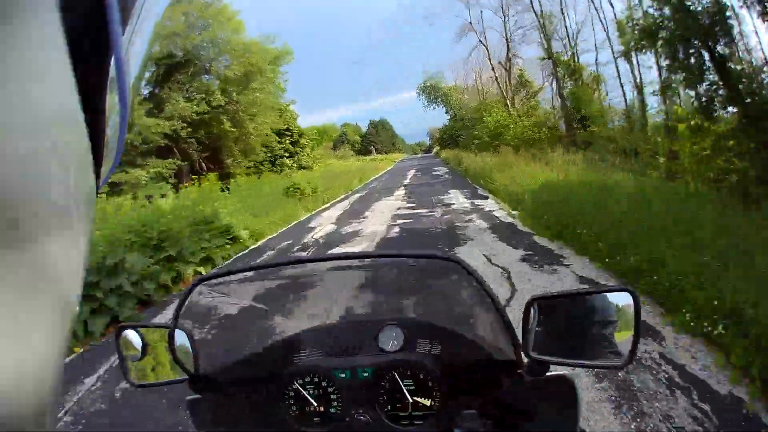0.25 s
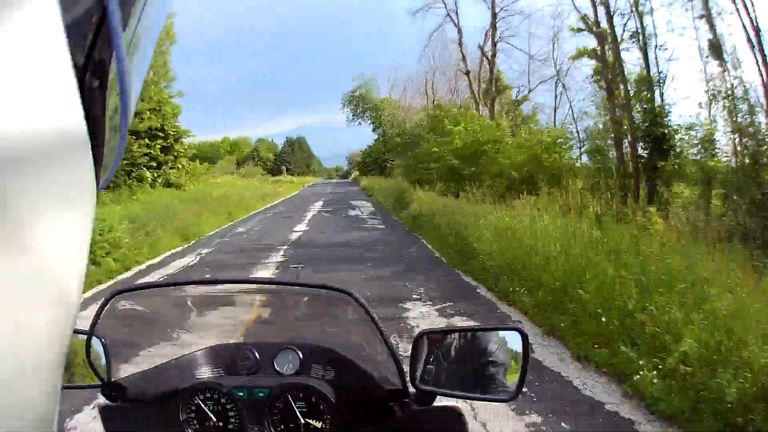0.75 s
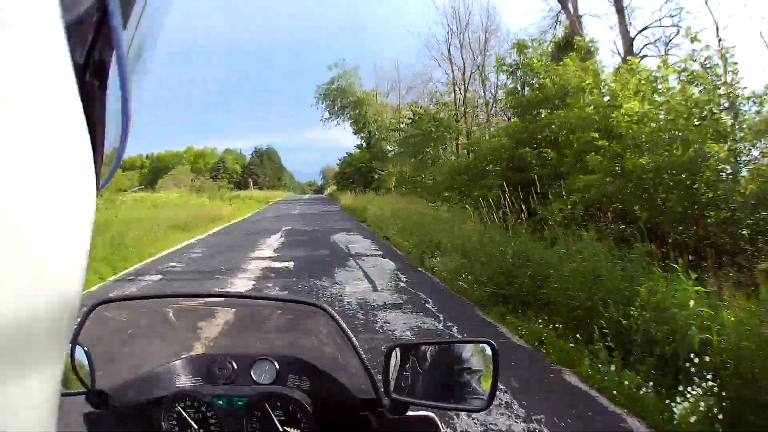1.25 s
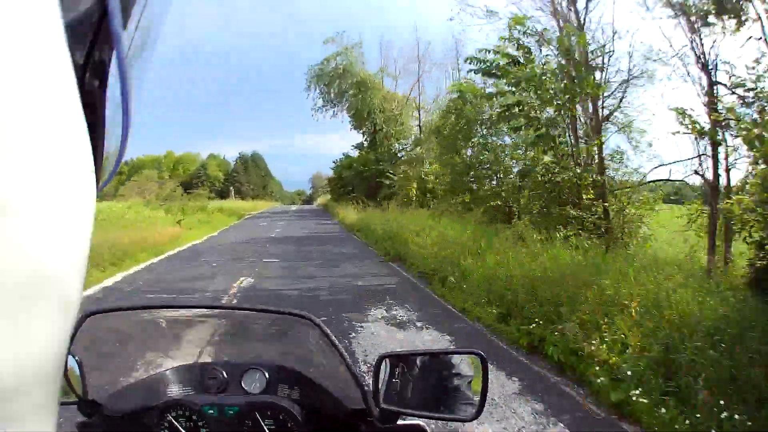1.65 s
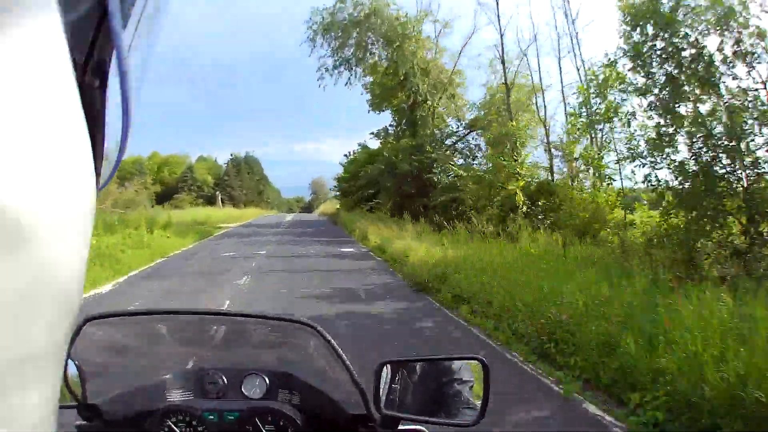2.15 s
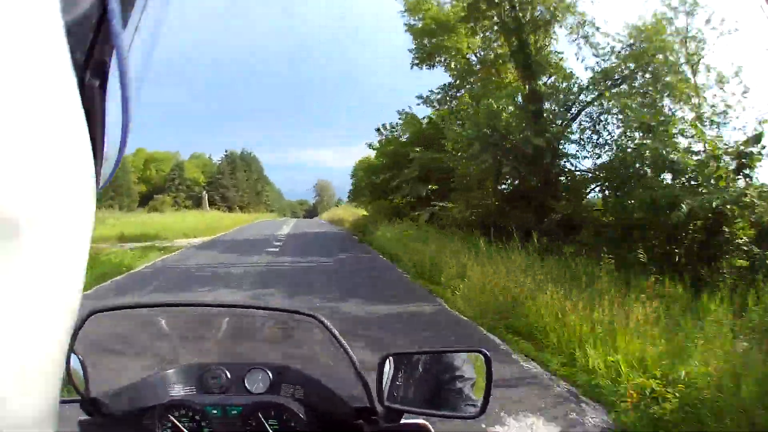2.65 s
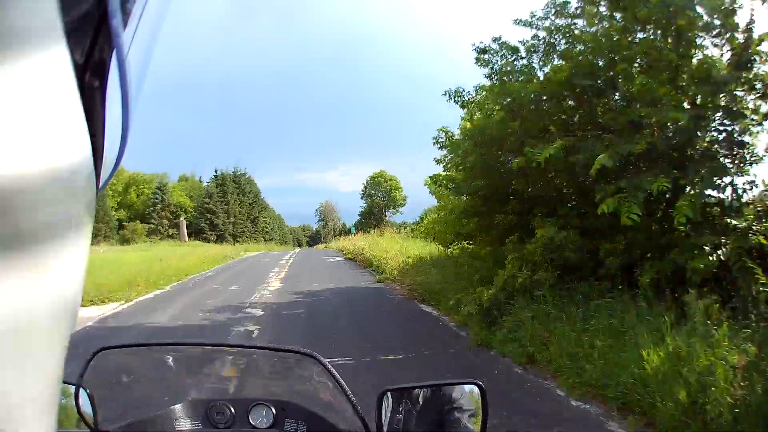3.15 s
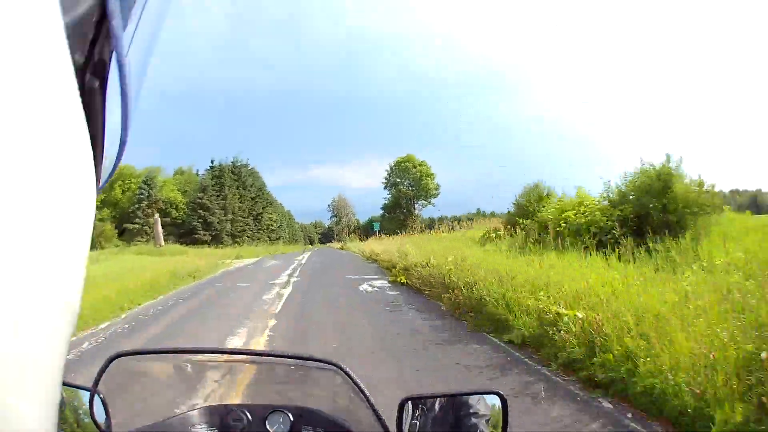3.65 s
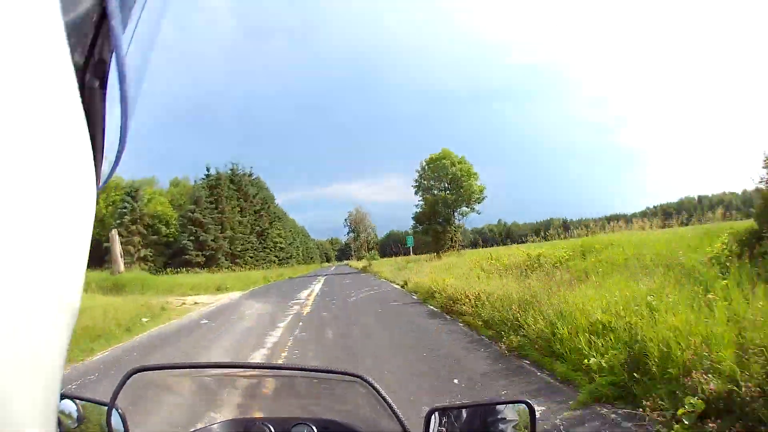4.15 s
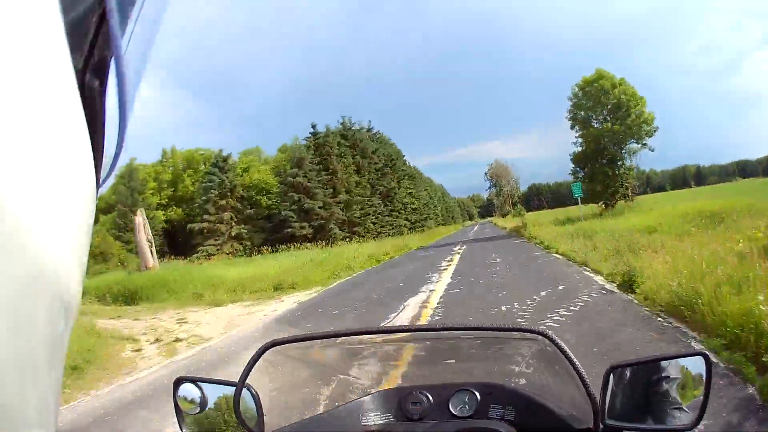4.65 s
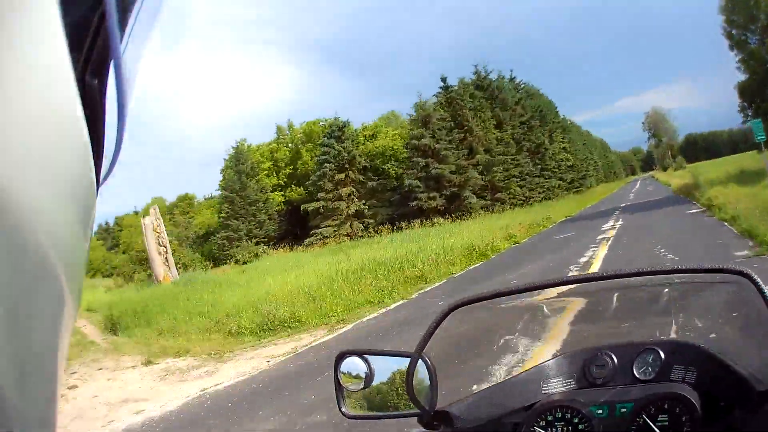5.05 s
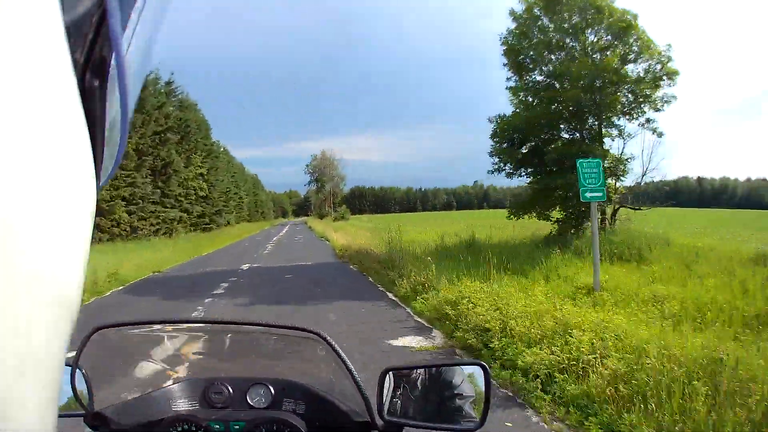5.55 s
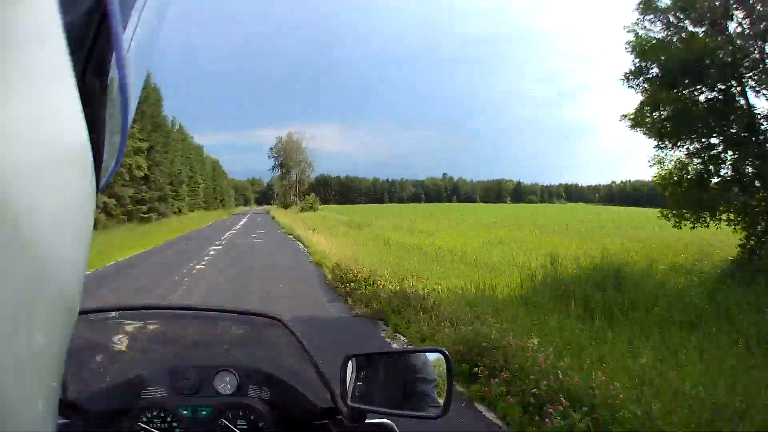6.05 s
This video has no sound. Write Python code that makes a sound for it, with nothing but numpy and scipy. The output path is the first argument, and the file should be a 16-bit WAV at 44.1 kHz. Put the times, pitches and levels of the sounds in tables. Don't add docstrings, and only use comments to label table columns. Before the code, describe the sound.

Outdoors on a country road, a small microphone at the rider's helmet catches a twin-cylinder motorcycle's low drone, valve knocking and thin gear whine under constant gusty wind. The throttle closes after two seconds, the pitch sinks and slack drive parts clack, then two quick blips lift the revs near the end. Small clicks and puffs pepper everything.

```python
import sys
import numpy as np
from scipy import signal
from scipy.io import wavfile

SR = 44100
rng = np.random.default_rng(int(sys.argv[2]) if len(sys.argv) > 2 else 0)


def elevation(decibels):
    levels = np.asarray(decibels, float)
    return 10 ** (levels / 20)


def pcm_store(signal):
    levels = np.round(np.clip(np.atleast_2d(signal), -1, 1) * 32767)
    wavfile.write(sys.argv[1], SR, levels.astype(np.int16).T)


N = 277389


def rms_one(x):
    return x / np.sqrt(np.mean(x ** 2) + 1e-20)


def in_time(rows):
    s, *columns = np.transpose(rows)
    return [np.interp(np.arange(N) / SR, s, c) for c in columns]


def drift(rate):
    r = np.exp(-40 * np.pi * rate / SR)
    white = rng.standard_normal(N // 20 + 4002)
    slow = signal.lfilter([1], [1, -2 * r, r * r], white)[4000:]
    return np.interp(np.arange(N) / 20, np.arange(len(slow)), rms_one(slow))


def resonate(x, hz, width):
    r = np.exp(-np.pi * width / SR)
    feedback = [1, -2 * r * np.cos(2 * np.pi * hz / SR), r * r]
    return signal.lfilter(np.array([1, 0, -1]) * (1 - r * r) / 2, feedback, x + 1e-18)


def soften(x, hz):
    return signal.sosfilt(signal.butter(2, hz, fs=SR, output="sos"), x + 1e-18)


def swell(top_s, rise_s, fall_s, hold_s):
    corners = top_s + np.cumsum([-abs(rise_s), abs(rise_s), hold_s + 1e-6, abs(fall_s)])
    return np.interp(np.arange(N) / SR, corners, [0, 1, 1, 0])


# (time [s], peak [dB], length [ms])
STEP_RUNS = [(.0579, -36, .5), (.0741, -40, .8), (.5085, -35, .6), (.6266, -35, 1.1), (.7129, -40, .9),
             (.8887, -37, 1.2), (1.0007, -41, .9), (1.1806, -39, .8), (1.6303, -37, 1.1),
             (2.0937, -40, 1.6), (2.3883, -40, 1.6), (2.5847, -39, 1.7), (2.8553, -34, .6),
             (2.8937, -37, 1.2), (3.2824, -36, 1.6), (3.3696, -36, 1.6), (3.7586, -39, 2.0),
             (3.801, -38, 1.1), (3.9045, -40, 1.0), (4.4616, -40, 1.6), (4.6247, -37, 1.2),
             (4.8166, -35, .8), (5.1308, -39, 1.1), (5.5438, -39, 2.5), (5.6147, -40, .7),
             (5.6253, -41, .7), (5.6713, -40, 1.9), (5.8193, -34, .8), (6.0868, -38, 1.2),
             (6.1067, -38, .9)]
# (time [s], peak [dB])
LONE_STEPS = [(.0457, -40), (.2001, -42), (.5181, -40), (.688, -40), (1.2171, -42), (1.408, -37),
              (1.4323, -38), (1.4984, -41), (1.5896, -41), (2.065, -40), (2.2798, -39), (2.6347, -39),
              (2.7777, -40), (2.7822, -35), (2.8179, -40), (3.0069, -42), (3.0695, -39), (3.1412, -42),
              (3.3191, -42), (3.653, -39), (4.0986, -40), (4.2222, -41), (4.274, -39), (4.2957, -38),
              (4.5171, -40), (4.6541, -39), (5.301, -40), (5.4638, -42), (6.2298, -40), (6.2129, -41)]
# (time [s], peak [dB])
FAINT_STEPS = [(0.0267, -46), (0.0327, -41), (0.0828, -45), (0.2306, -53), (0.2694, -48), (0.3097, -47),
               (0.3519, -46), (0.396, -46), (0.4399, -44), (0.4996, -42), (0.5709, -53), (0.5864, -42),
               (0.5989, -52), (0.6433, -44), (0.8734, -46), (0.9035, -46), (0.9511, -47), (0.9887, -47),
               (1.0513, -53), (1.0898, -51), (1.1285, -49), (1.2269, -51), (1.2678, -44), (1.3103, -51),
               (1.3758, -52), (1.4551, -52), (1.472, -46), (1.4779, -51), (1.4852, -43), (1.5243, -53),
               (1.5726, -49), (1.6537, -46), (1.744, -50), (1.7728, -49), (1.8409, -51), (1.8765, -53),
               (1.9156, -45), (2.0237, -48), (2.0693, -52), (2.1161, -52), (2.1953, -44), (2.2592, -44),
               (2.3759, -52), (2.3965, -51), (2.4243, -53), (2.5343, -52), (2.577, -45), (2.5979, -49),
               (2.6264, -50), (2.64, -49), (2.7224, -48), (2.7885, -42), (2.8293, -50), (2.847, -42),
               (2.8834, -50), (2.9143, -46), (2.9762, -46), (2.99, -51), (3.1008, -43), (3.128, -46)]
# (time [s], peak [dB])
LATE_STEPS = [(3.1559, -49), (3.1667, -51), (3.1837, -42), (3.2315, -51), (3.2936, -53), (3.3507, -42),
              (3.415, -45), (3.4454, -43), (3.4712, -53), (3.5073, -51), (3.5272, -51), (3.6271, -51),
              (3.7084, -46), (3.7401, -53), (3.8435, -49), (3.9168, -53), (4.153, -45), (4.2143, -53),
              (4.2438, -45), (4.3933, -50), (4.4177, -51), (4.446, -47), (4.4945, -51), (4.5375, -52),
              (4.5629, -53), (4.5906, -41), (4.6149, -50), (4.6775, -45), (4.7079, -45), (4.8512, -40),
              (4.9307, -47), (4.9836, -43), (5.0731, -46), (5.1053, -49), (5.1501, -47), (5.1786, -43),
              (5.2071, -44), (5.2433, -50), (5.2613, -42), (5.306, -45), (5.3973, -44), (5.4266, -45),
              (5.4929, -47), (5.5308, -51), (5.5494, -47), (5.6077, -49), (5.6602, -44), (5.7139, -49),
              (5.7458, -45), (5.7699, -52), (5.7772, -51), (5.8465, -47), (5.919, -51), (5.9488, -48),
              (6.002, -47), (6.0307, -46), (6.0679, -42), (6.1604, -46), (6.2421, -48), (6.2823, -53)]


def gain_steps(fade, gain_db, faint_per_s, faint_db):
    present = rng.random(N) < faint_per_s / SR
    jumps = present * elevation(faint_db + 4.0 * rng.standard_normal(N)) * rng.choice([-1, 1], N)
    ticks = STEP_RUNS + [(s, db, 0) for s, db in LONE_STEPS + FAINT_STEPS + LATE_STEPS]
    chance = rng.random((len(ticks), 3, 9))
    for (s, peak_db, length_ms), (gaps, sizes, signs) in zip(ticks, chance):
        gaps_ms = .22 + .24 * gaps
        after_ms = np.cumsum(gaps_ms) - gaps_ms[0]
        used = after_ms <= length_ms + .1
        size = np.where(used.sum() > 1, .5 + .5 * sizes, 1)
        size = size * elevation(peak_db + gain_db) * np.sign(signs[0] - .5)
        at = np.round((s + after_ms[used] / 1000) * SR).astype(int)
        np.add.at(jumps, at, size[used])
    return signal.lfilter([1], [1, -min(fade, .98)], jumps)


# (time of top [s], swell [dB], rise [s], fall [s], brightness [about -1 to 1])
GUSTS = [(0.0, 10.5, .05, 0.1, -0.32), (.61, 5, 0.64, .07, 0.3), (.88, 4.5, 0.33, 0.06, 0.31),
         (1.47, 7, 0.62, 0.27, -0.026), (1.8, 2, 0.11, 0.15, -1.2), (2.049, 6.5, 0.31, .12, -0.26),
         (2.241, 5, 0.087, 0.13, -0.22), (2.379, 6, 0.086, 0.025, -0.33), (2.571, 5.5, 0.25, .06, -0.38),
         (2.73, 5, 0.22, 0.27, -0.091), (2.872, 6, 0.05, 0.038, 0.29), (2.95, 6.5, 0.16, 0.43, -0.16),
         (3.28, 3.5, 0.23, 0.21, 0.12), (3.589, 2, 0.16, 0.11, -1), (3.682, 4, .3, 0.099, 0.38),
         (3.851, 7, 0.24, 0.13, 0.09), (4.3, 2.5, 0.46, 0.091, 0.59), (4.47, 6.5, 0.16, 0.21, 0.028),
         (4.78, 3.5, 0.12, .09, 0.41), (4.992, 7, 0.13, 0.29, 0.39), (5.119, 3.5, 0.12, 0.027, -1.1),
         (5.221, 5.5, 0.051, 0.89, 0.039), (5.527, 5.5, 0.1, 0.3, -0.23), (5.968, 6.5, 0.057, 0.14, -0.24),
         (6.121, 5, 0.24, 0.9, 0.027)]


def gusts():
    shapes = [(db * swell(s, rise_s, fall_s, 0), bright) for s, db, rise_s, fall_s, bright in GUSTS]
    return [sum((1 + side * bright) * shape for shape, bright in shapes) for side in (-1, 0, 1)]


# (frequency [Hz], level [dB per Hz])
AIR = [(10, -6.5), (22, -2.5), (40, -2.5), (80, 3.5), (130, 0), (200, -2.5), (350, -5.5), (700, -8.5),
       (1100, -17.5), (1500, -19.5), (2400, -27.5), (3200, -37.5), (5000, -45), (8000, -58), (15500, -68)]


def wind(lump_db, flicker_db, own_db, level_db):
    edges = 8.82 * 2 ** np.arange(0, 10.9, 1 / 3)
    strengths = [c - c.mean() for c in gusts()]
    white = rng.standard_normal((2, N))
    lumps, flicker = drift(25), drift(130)
    air_hz, air_db = np.transpose(AIR)
    out = 0
    for k, (low, high) in enumerate(zip(edges, edges[1:])):
        octave = np.log2(np.sqrt(low * high))
        place = np.interp(octave, np.log2([280, 850, 2700]), [0, 1, 2])
        gust = sum(max(0, 1 - abs(place - j)) * c for j, c in enumerate(strengths))
        reach = np.interp(octave, np.log2([100, 500, 2500, 9000]), [0.23, 0.51, 0.6, 0.68])
        sway_db = reach * (lump_db * lumps + flicker_db * flicker) + own_db * drift(38)
        band_filter = signal.butter(2, [low, high], "band", fs=SR, output="sos")
        band = signal.sosfilt(band_filter, white[k % 2])
        out = out + elevation(np.interp(octave, np.log2(air_hz), air_db) + gust + sway_db) * band
    return elevation(level_db) * rms_one(out)


# (frequency [Hz], width [Hz], level [dB])
FAIRING = [(640, 40, -49), (1280, 25, -61), (1360, 90, -59), (1760, 45, -61), (2030, 60, -63),
           (2790, 80, -70)]


def fairing(turns_hz, flutter_db, db_per_hz):
    white = rng.standard_normal(N)
    hums = 0
    for hz, width, db in FAIRING:
        hum = resonate(resonate(white, hz, width), hz, width)
        hums = hums + elevation(db + flutter_db * drift(6.3)) * rms_one(hum)
    return elevation(db_per_hz * (turns_hz - 46)) * hums


# (time [s], peak [dB], frequency [Hz])
PUFFS = [(0.119, -20, 722), (0.74, -15, 775), (1.717, -15.5, 339), (2.087, -12, 297), (2.458, -14.5, 302),
         (2.827, -13, 290), (2.865, -14, 526), (2.988, -25, 567), (3.409, -16, 366), (3.583, -20.5, 629),
         (3.878, -15, 354), (4.948, -18, 617), (6.004, -28, 620)]
# (time [s], peak [dB], frequency [Hz])
RATTLES = [(2.249, -26, 1204), (2.8803, -15, 1239), (2.9886, -21.5, 1378), (3.9173, -20.5, 1416),
           (4.99, -30, 1546), (5.0653, -33, 1490), (5.243, -27.5, 1800), (5.5188, -16, 1678),
           (5.536, -32.5, 1936), (5.552, -19.5, 1563), (5.95, -25, 1335), (6.0503, -19.5, 1580)]


def slaps(table, cycles, gain_db):
    out = np.zeros(N)
    t = np.arange(600) / SR
    for k, (s, peak_db, hz) in enumerate(table):
        i = round(s * SR)
        swing = np.sin(2 * np.pi * hz * t) * np.exp(-t * hz / cycles)
        out[i:i + len(t)] += (-1) ** k * elevation(peak_db + gain_db) * swing
    return out


# (time [s], depth [dB], width [ms])
EDDIES = [(0.015, -26, 0.61), (0.0404, -16, 0.83), (0.051, -25, 0.8), (0.428, -17, 1.8),
          (0.5672, -17.5, 0.71), (1.2935, -16, 1.3), (1.307, -16, 0.65), (1.317, -21, 1.1),
          (1.362, -22, 0.78), (1.4286, -17, 0.99), (1.4409, -24, 0.73), (1.4761, -12, 1.4),
          (1.4988, -19, 1.3), (1.5352, -18, 1.9), (1.7083, -18, 2.7), (1.833, -25, 0.52),
          (2.0232, -14.5, 2), (2.035, -17, 0.85), (2.0455, -15, 2.2), (2.1776, -20, 2.2),
          (2.2066, -20, 1.3), (2.4929, -11.5, 2.5), (2.5054, -17, 0.43), (2.5675, -23, 2.4),
          (2.6784, -17, 1.7), (2.7659, -14, 0.9), (2.7914, -14, 1.9), (2.8714, -14, 0.58),
          (2.9158, -16, 0.81), (2.9617, -14, 1.5), (2.9923, -10, 0.71), (3.0083, -26, 2),
          (3.2319, -14, 0.86), (3.2596, -14, 1.6), (3.266, -19, 0.77), (3.3199, -15, 1.7),
          (3.6256, -17, 1.6), (3.7746, -14, 1.2), (3.8605, -23, 0.9), (3.882, -15, 0.74),
          (4.4744, -15, 1.0), (5.0906, -19, 2.7), (5.1123, -16, 1.2), (5.2991, -17, 0.37),
          (5.4815, -18, 0.72), (5.5249, -11, 1.3), (5.5376, -13, 1.3), (5.551, -20, 0.56),
          (5.7269, -18, 0.71), (5.9768, -22, 2.7), (6.007, -26, 1.9), (6.01, -19, 0.87), (6.0184, -17, 1.2),
          (6.0309, -11, 2.4), (6.0394, -18, 0.57), (6.0539, -14, 0.74), (6.0723, -9.5, 1.9),
          (6.103, -24, 1.3), (6.1212, -16, 2.1), (6.2064, -17, 0.88)]


def eddies(gain_db):
    out = np.zeros(N)
    for s, depth_db, width_ms in EDDIES:
        u = np.arange(-200, 201) / SR / (width_ms / 2000)
        i = round(s * SR)
        out[i - 200:i + 201] -= elevation(depth_db + gain_db) * (1 - u ** 2) * np.exp(-u ** 2 / 2)
    return out


def lulls(depth, length_s):
    t = np.arange(N) / SR
    starts = [s for s, *_ in PUFFS + RATTLES + EDDIES]
    return np.min([1 - depth * ((t > s - length_s) & (t < s)) for s in starts], axis=0)


def tyres(turns, level_db, wobble_db, waver):
    thumps_per_turn = .47
    phase = 2 * np.pi * thumps_per_turn * turns + waver * drift(1.8)
    return np.sqrt(2) * elevation(level_db + wobble_db * drift(3)) * np.cos(phase)


# (time [s], length [s], frequency [Hz], level [dB])
BUZZES = [
    (.3, .55, 1752, -55),
    (2.1, .05, 1368, -47),
    (2.28, 0.43, 1372, -50),
]


def buzzes(width, fade_s):
    white = rng.standard_normal(N)
    out = 0
    for s, length_s, hz, db in BUZZES:
        hum = rms_one(resonate(resonate(white, hz, width), hz, width))
        out = out + elevation(db) * swell(s, fade_s, fade_s, length_s) * hum
    return out


# (time [s], peak [dB])
CLACKS = [(2.3226, -39.5), (2.3758, -36.5), (2.7626, -42), (2.8593, -37), (2.9565, -39), (3.0126, -47.5),
          (3.2305, -41), (3.4873, -37), (3.6086, -39.5), (3.909, -43.5), (3.9539, -40), (4.2981, -38.5),
          (4.3483, -40), (4.4003, -44), (4.444, -34), (4.496, -35), (4.556, -38.5), (4.604, -40),
          (4.6868, -40.5), (4.9475, -40.5), (5.0062, -37), (5.0654, -44.5), (5.241, -34.5), (5.4081, -43),
          (5.455, -37.5), (5.5133, -34), (5.5374, -31.5), (5.57, -34.5), (5.9523, -35.5), (5.9935, -44.5)]
# (frequency [Hz], width [Hz], level [dB])
COVER = [(2150, 250, 2.5), (3510, 210, -15.5), (5500, 1500, -25.5)]


def drive_slack(gain_db):
    s, peak_db = np.transpose(CLACKS)
    hits = np.zeros(N)
    hits[np.round(s * SR).astype(int)] = elevation(peak_db + gain_db)
    return sum(elevation(db) * resonate(hits, hz, width) * SR / (2 * np.pi * width) for hz, width, db in COVER)


# (time [s], length [s], level [dB])
MESHING = [
    (-.1, 1.6, -41),
    (2.478, 0.13, -45),
    (3.515, 0.26, -39.5),
    (4.59, .1, -44),
    (4.993, 0.59, -39.5),
]


def gear_whine(turns, gain_db, waver, overtone_db):
    idle_db, fade_s = -48, .1
    load_db = sum((db - idle_db) * swell(s, fade_s, fade_s, length_s) for s, length_s, db in MESHING)
    level_db = idle_db + load_db + gain_db
    phase = 2 * np.pi * 15 * turns + waver * drift(4.8)
    octave = elevation(overtone_db + 2.5 * drift(3)) * np.sin(2 * phase + .9 * drift(20))
    return np.sqrt(2) * (elevation(level_db + drift(8)) * np.sin(phase) + octave)


# (share of cycle [0-1], level [dB])
KNOCKS = [(0.081, -11), (0.26, -4), (0.573, -8.5), (0.981, -6.5)]
# (frequency [Hz], width [Hz], level [dB])
CASING = [(520, 310, -21), (768, 100, 12.5), (898, 140, 11.5), (1454, 33, 1), (1800, 89, -4.5),
          (2750, 200, -34)]


def valve_gear(turns, level_db, uneven_db, jitter_s):
    hits = np.zeros(N)
    for share, hit_db in KNOCKS:
        at = np.flatnonzero(np.diff(np.floor(turns / 2 - share)) > 0)
        chance = rng.standard_normal((200, 2))[:len(at)]
        at = np.clip(at + (jitter_s * SR * chance[:, 0]).astype(int), 0, N - 1)
        hits[at] += elevation(hit_db + uneven_db * chance[:, 1])
    rings = sum((-1) ** k * elevation(db) * resonate(hits, hz, width) for k, (hz, width, db) in enumerate(CASING))
    return elevation(level_db) * rms_one(rings)


# (time [s], level [dB])
MISFIRES = [
    (.12, -3.5),
    (2.169, -5.5),
    (2.35, -3.5),
    (2.73, -9.5),
    (3.45, -2.5),
    (4.32, -4),
    (4.85, -5),
    (5.23, -3.5),
]


def misfires():
    return sum(db * swell(s, .04, .04, 0) for s, db in MISFIRES)


def exhaust(turns, level_db, throttle, opened, slowed_hz, wobble_db, waver):
    first_db = -29 - 12.5 * throttle ** 2
    third_db = level_db - 8 + 0.4854 * slowed_hz - 11.5 * (1 - opened)
    closed_lead = -.15 + .12 * np.maximum(slowed_hz - 4.5, 0)
    lead = opened * 1.35 + (1 - opened) * closed_lead
    orders = [(first_db, lead), (level_db, 0), (third_db, .6 * lead + .7),
              (first_db - 14, lead), (third_db - 16, lead)]
    out = 0
    for k, (order_db, ahead) in enumerate(orders, start=1):
        phase = 2 * np.pi * k * turns + ahead + waver * drift(7)
        out = out + np.sqrt(2) * elevation(order_db + wobble_db * drift(23)) * np.cos(phase)
    return out


# (time [s], speed [turns per s])
SPEED = [(0.0, 49.45), (1.45, 48.39), (1.7, 47.98), (1.97, 46.82), (2.07, 44.15), (2.2, 46.92),
         (3.1, 44.33), (3.65, 41.26), (3.93, 38.99), (4.5, 36.93), (5.0, 35.88), (5.45, 35.35),
         (5.61, 34.16), (5.735, 37.62), (5.79, 34.74), (5.99, 33.32), (6.17, 43.81), (6.29, 43.26)]
# (time [s], exhaust level [dB], throttle [0-1])
THROTTLE = [(0, -19, 0.5), (.5, -17.5, 0.7), (.8, -17.5, 0.5), (1.05, -20.5, 1.0), (1.45, -17.5, 0.8),
            (1.68, -22.5, 0.93), (1.97, -21.5, 0.4), (2.1, -22, 0.18), (3.0, -25.5, 0.14), (3.6, -23, 0.09),
            (3.95, -29, 0.1), (4.2, -25, 0.24), (4.9, -27, 0.32), (5.55, -26.5, 0.28), (5.72, -23, 0.6),
            (5.77, -27.5, 0.27), (5.97, -29.5, 0.8), (6.18, -19, 0.4)]


def scene():
    turns_hz, = in_time(SPEED)
    level_db, throttle = in_time(THROTTLE)
    level_db = level_db + misfires()
    opened = np.clip(throttle / .65, 0, 1)
    slowed_hz = turns_hz[0] - turns_hz
    turns = -.229 + np.cumsum(turns_hz) / SR

    engine = exhaust(turns, level_db, throttle, opened, slowed_hz, wobble_db=.9, waver=.1)
    engine += gear_whine(turns, gain_db=1, waver=.2, overtone_db=-61)
    knock_db = level_db - 27 + 3.5 * opened
    engine += soften(valve_gear(turns, knock_db, uneven_db=1.5, jitter_s=.00004), 2800)
    engine += soften(drive_slack(gain_db=6.5), 6200)
    air = wind(lump_db=0.2, flicker_db=2.2, own_db=1.35, level_db=-27.0)
    air += fairing(turns_hz, flutter_db=1.3, db_per_hz=2.2)
    air *= soften(lulls(depth=.4, length_s=.005), 250)
    engine += tyres(turns, level_db=-39.5, wobble_db=1.5, waver=1.1)
    engine += buzzes(width=21, fade_s=.06)
    blows = slaps(PUFFS, cycles=0.74, gain_db=1.1) + slaps(RATTLES, cycles=1.4, gain_db=4.0)
    blows += eddies(gain_db=-3.0)

    near = engine + air
    lopsided = 0.97 * (1 - opened) * near ** 2
    steep = signal.sosfilt(signal.butter(2, 18, "high", fs=SR, output="sos"), lopsided)
    return (near + steep + soften(blows, 1900))[None]


def band_limit(x):
    return signal.sosfilt(signal.butter(12, 15800, fs=SR, output="sos"), x)


def record(dry):
    loud = 1.3 * np.tanh(dry / 1.3)
    dull = signal.sosfilt(signal.butter(8, 14200, fs=SR, output="sos"), loud)
    steps = gain_steps(fade=0.65, gain_db=10.5, faint_per_s=12, faint_db=-52)
    steps = signal.sosfilt(signal.butter(5, 14800, fs=SR, output="sos"), steps + 1e-18)
    return band_limit(dull + steps)


dry = scene()
out = record(dry)
pcm_store(out)
```